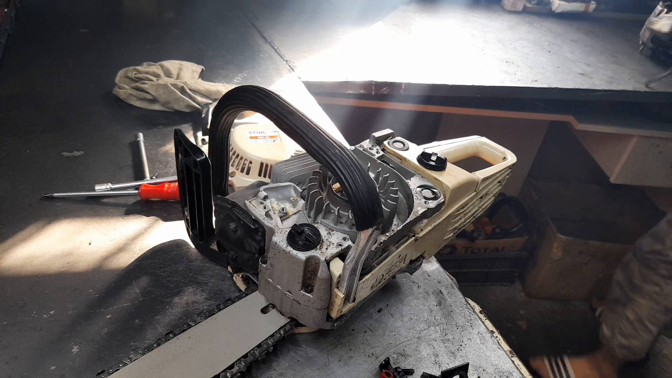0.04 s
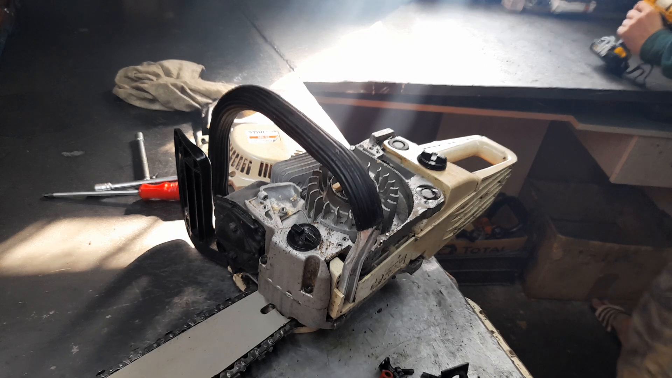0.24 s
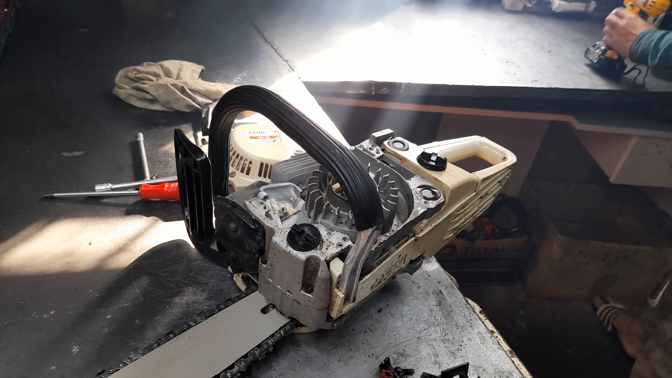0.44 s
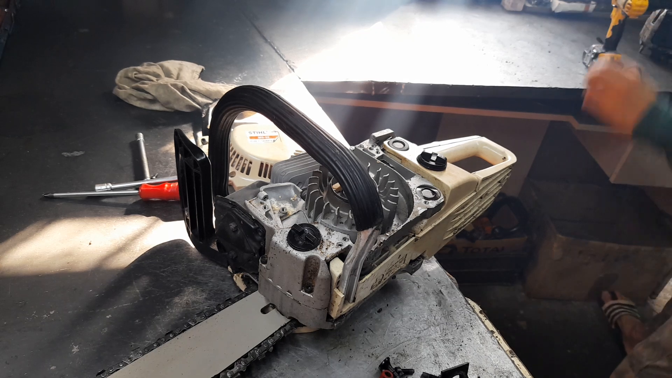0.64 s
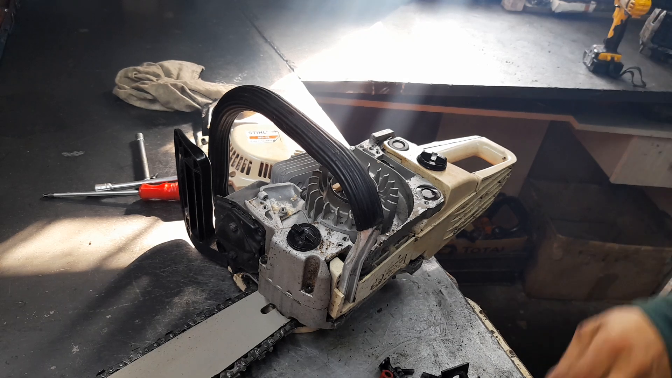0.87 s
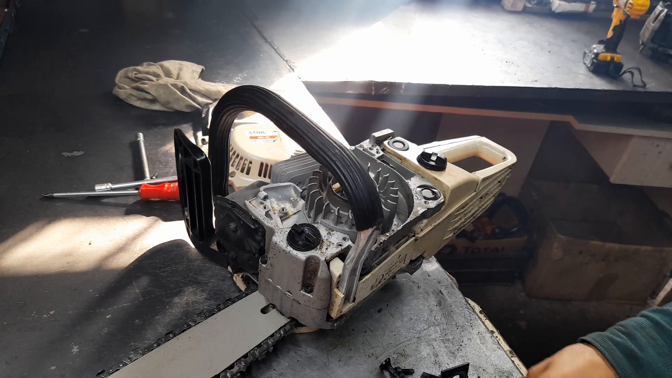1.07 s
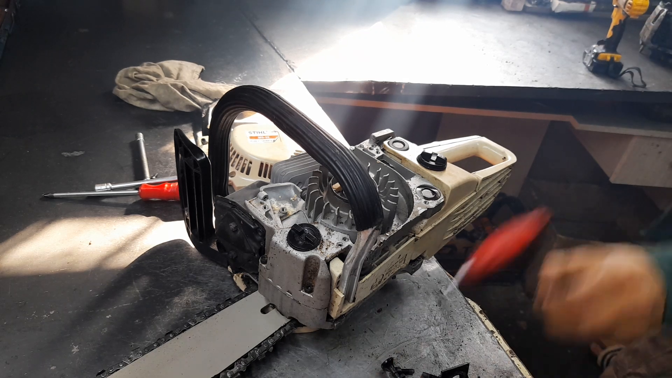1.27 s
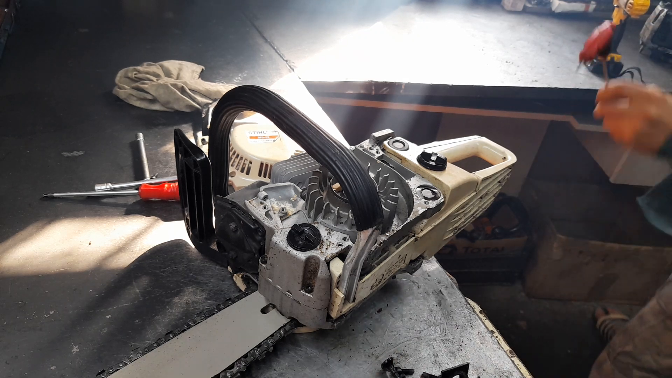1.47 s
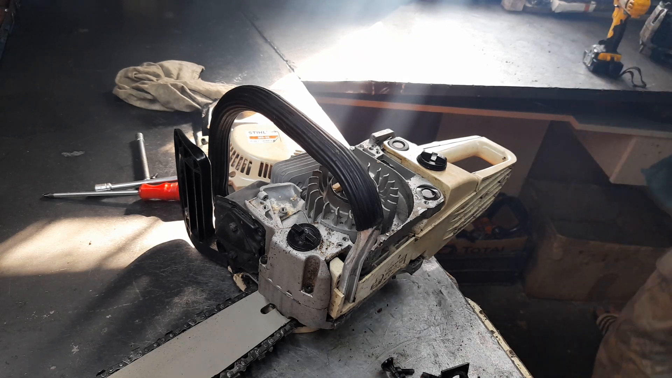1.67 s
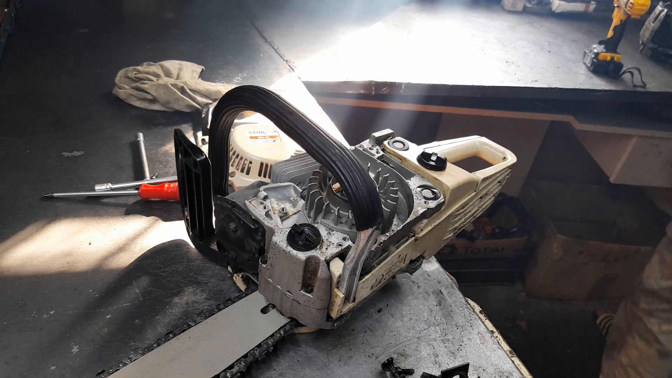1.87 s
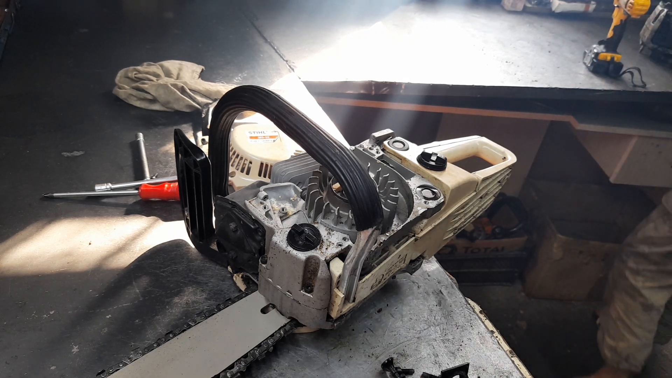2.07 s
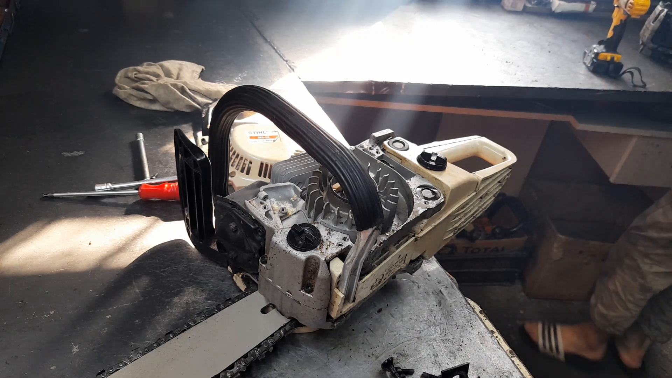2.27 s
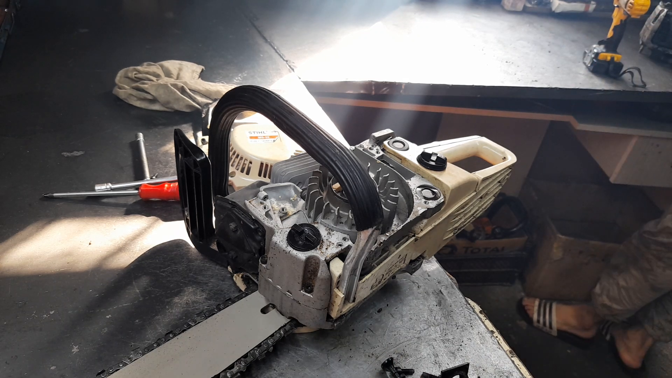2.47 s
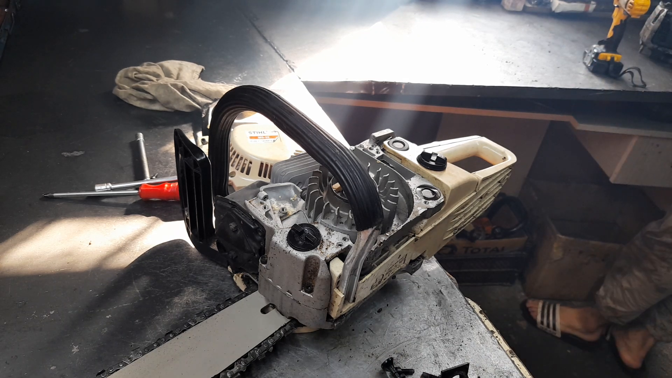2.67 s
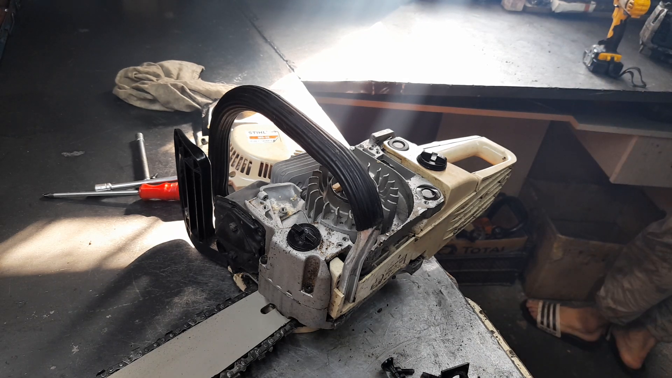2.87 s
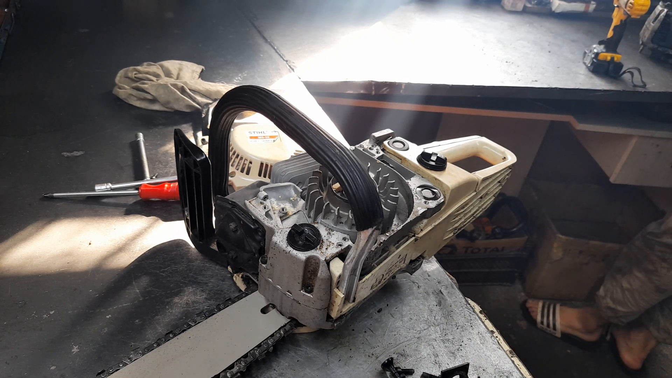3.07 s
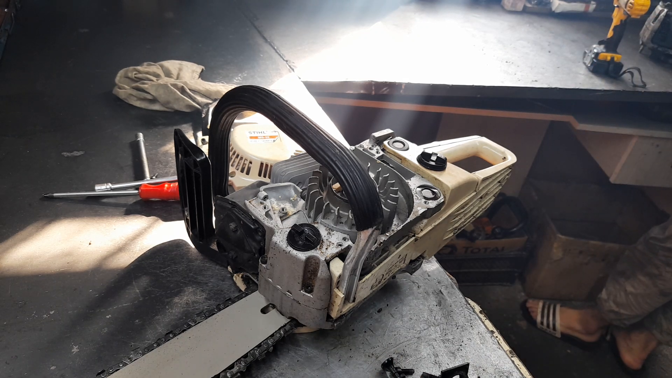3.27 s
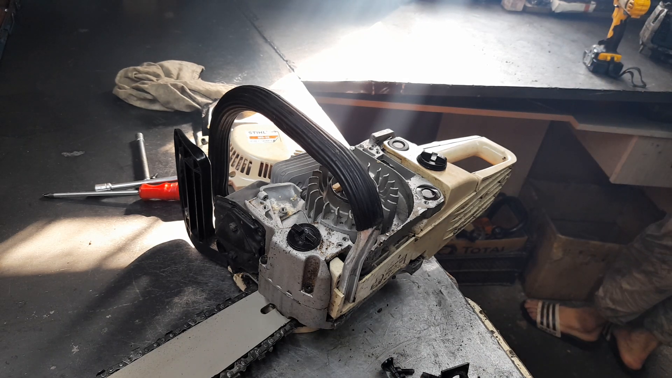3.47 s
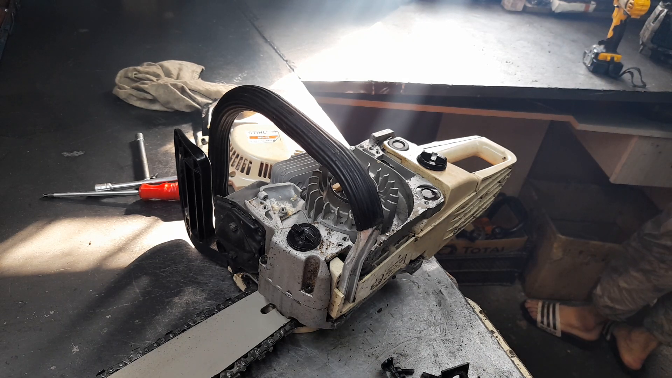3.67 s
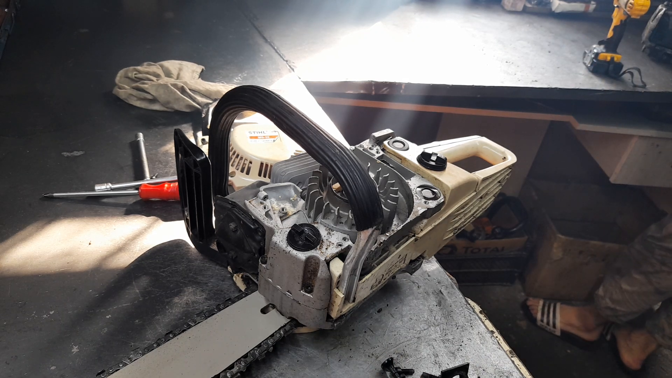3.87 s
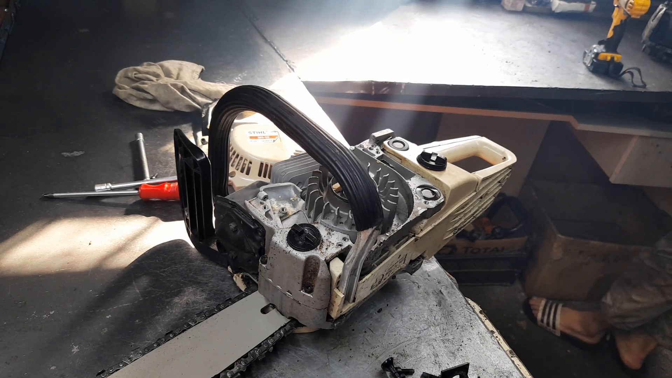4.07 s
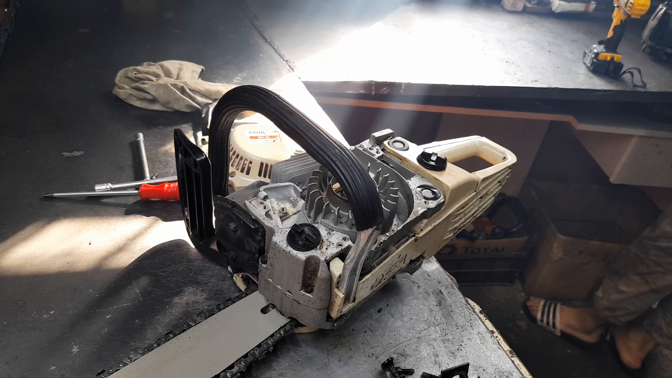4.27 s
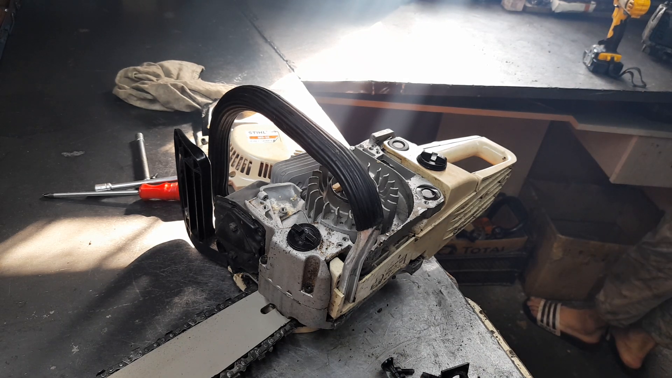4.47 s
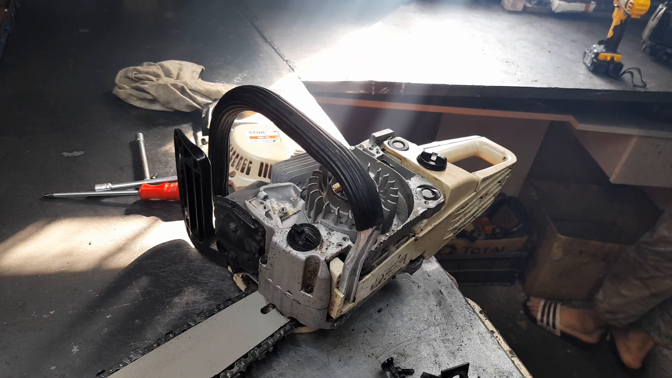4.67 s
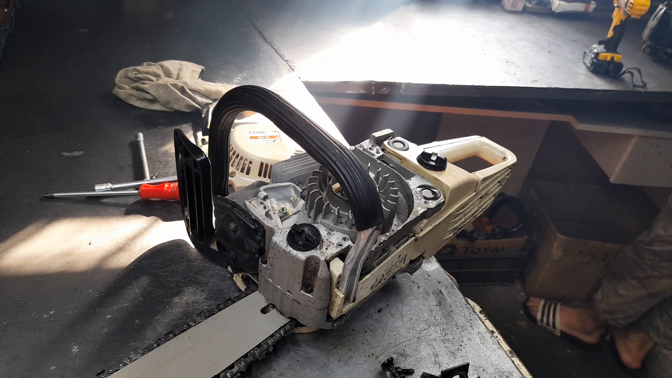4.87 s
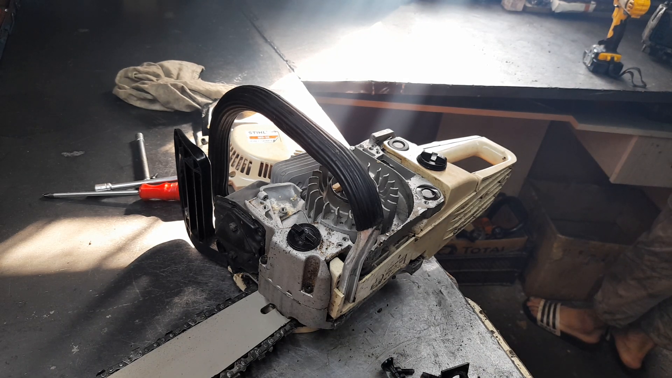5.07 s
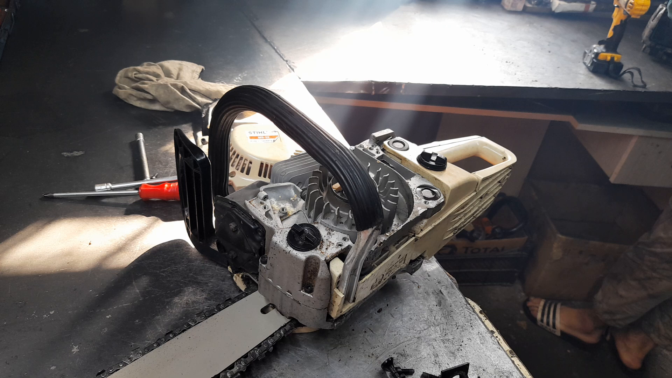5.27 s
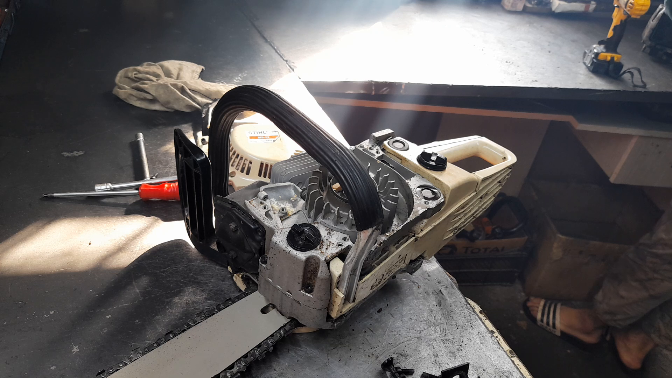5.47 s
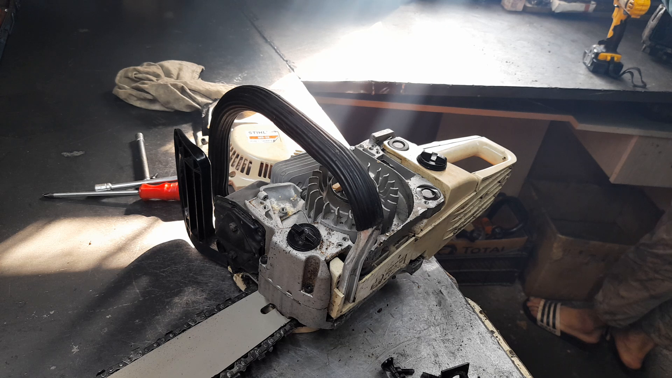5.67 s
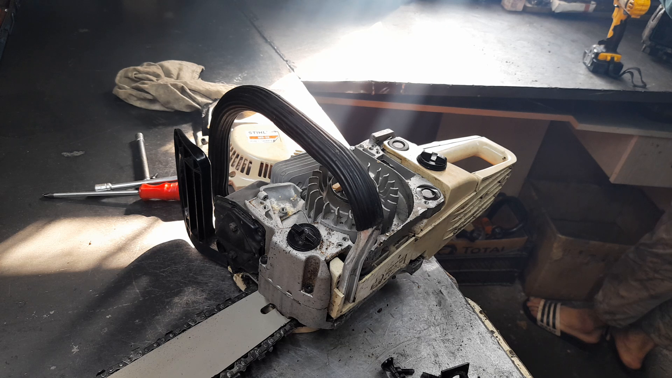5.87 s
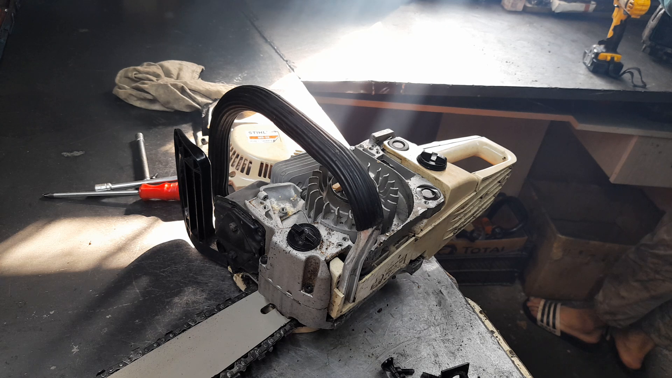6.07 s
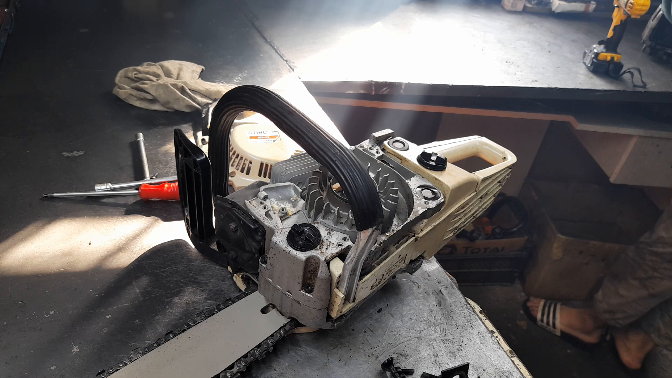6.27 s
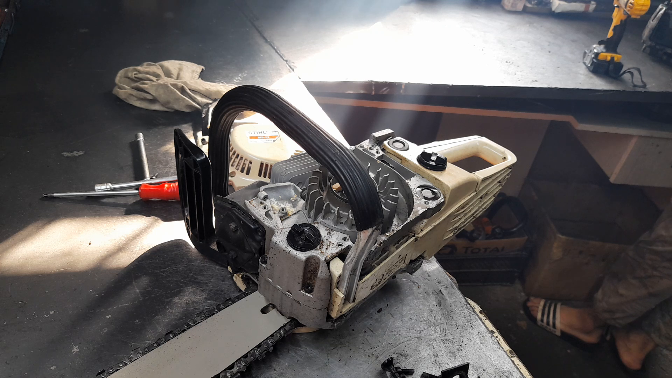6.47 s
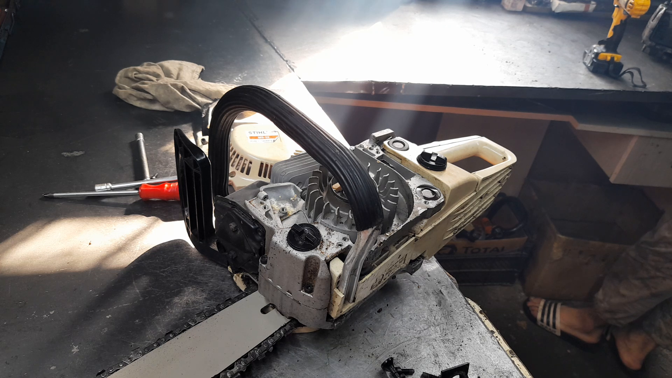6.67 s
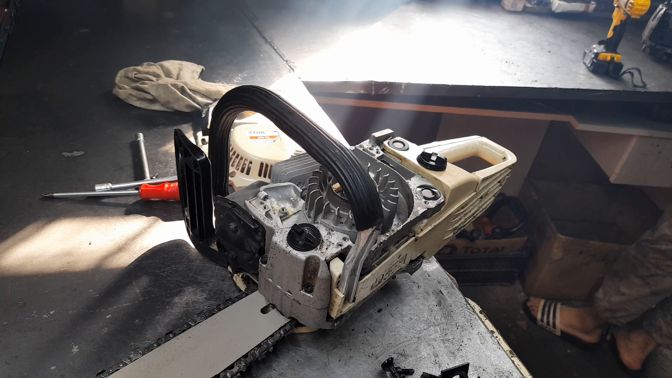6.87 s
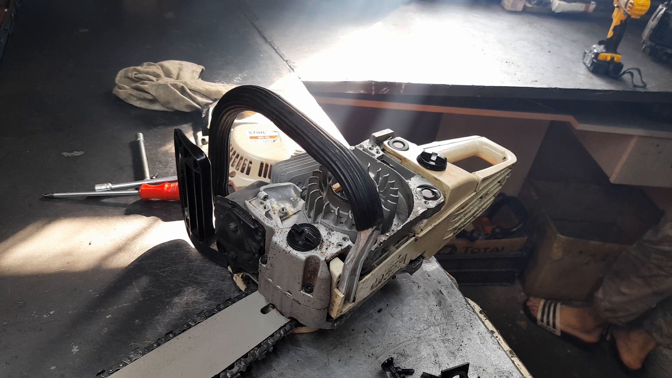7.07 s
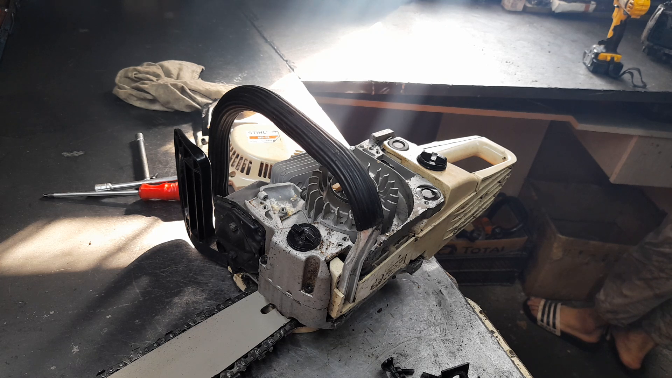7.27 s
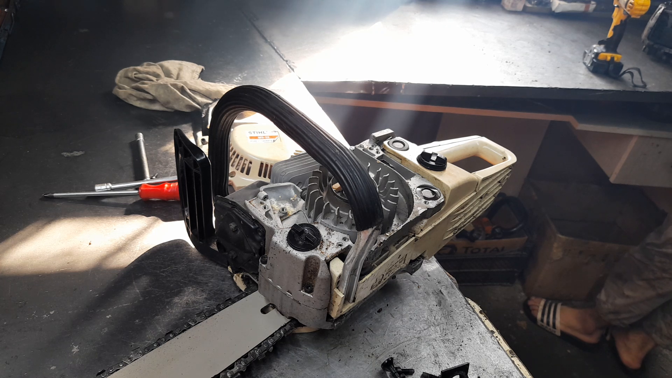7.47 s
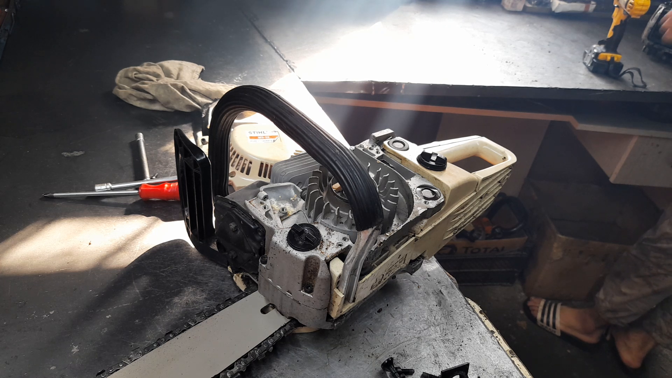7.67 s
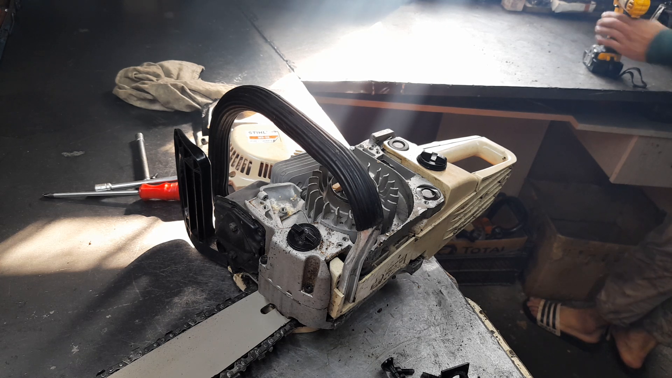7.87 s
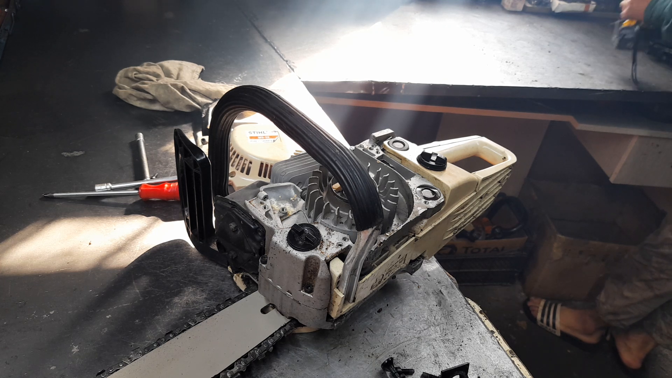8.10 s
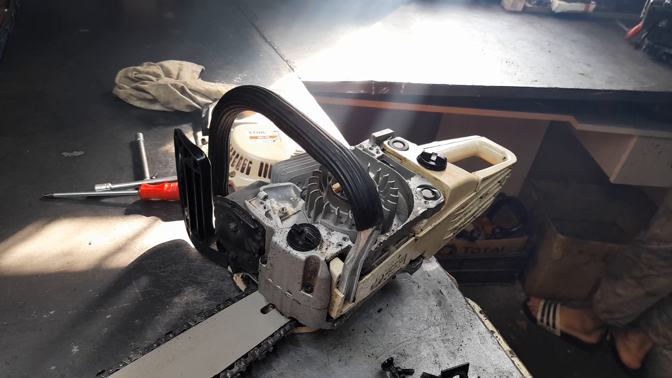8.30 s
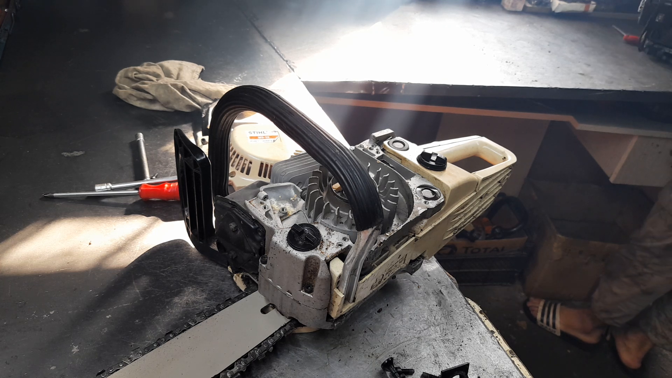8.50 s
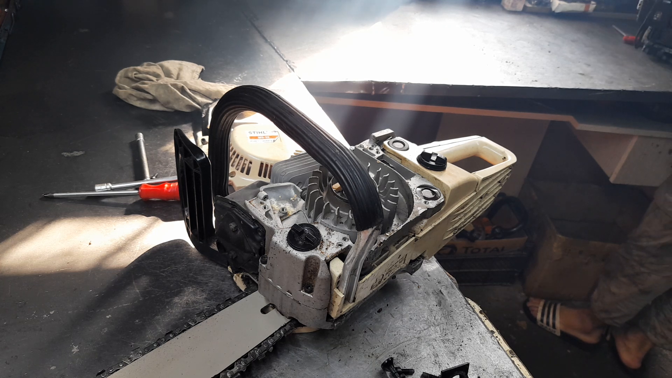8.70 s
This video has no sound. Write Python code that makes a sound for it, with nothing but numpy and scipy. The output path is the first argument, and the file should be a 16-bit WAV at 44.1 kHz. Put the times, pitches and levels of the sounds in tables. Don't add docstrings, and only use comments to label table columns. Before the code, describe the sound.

Skid and heavy tool knock in a small workshop, sparse sandal slaps over booming boards, ending with a burst of ringing part drops.

```python
import sys
import numpy as np
from scipy import signal
from scipy.fft import rfft, irfft, next_fast_len
from scipy.io import wavfile
from scipy.ndimage import uniform_filter1d

SR = 44100
rng = np.random.default_rng(int(sys.argv[2]) if len(sys.argv) > 2 else 0)


def ratio(d):
    e = np.asarray(d, float) / 20
    return 10 ** e


def int16_out(signal):
    q = np.round(np.clip(np.atleast_2d(signal).T, -1, 1) * 32767)
    wavfile.write(sys.argv[1], SR, q.astype(np.int16))


N = 385434
CLOSE_DIRECT, FAR_DIRECT = 0.3, 0.12


def evened(x):
    return x / np.sqrt(np.mean(x ** 2) + 1e-20)


def read(points, hz):
    f, value = np.transpose(points)
    return np.interp(np.log(hz + 1), np.log(f + 1), value)


def add(mix, s, sound):
    part = mix[round(s * SR):][:len(sound)]
    part += sound[:len(part)]


def resonate(x, hz, width):
    return signal.lfilter(*signal.iirpeak(hz, hz / width, SR), x)


def follow(x, hz, width):
    turn = np.exp(2j * np.pi * np.cumsum(hz) / SR)
    r = np.exp(-np.pi * width / SR)
    return (turn * signal.lfilter([1 - r], [1, -r], x / turn)).real


def band(x, lo_hz, hi_hz):
    sos = signal.butter(2, [lo_hz, hi_hz], "band", fs=SR, output="sos")
    return evened(signal.sosfiltfilt(sos, x))


# (frequency [Hz], level per Hz [dB])
AIR = [(65, -28), (110, 2), (125, -15.5), (211, -29), (487, -25), (1280, -33), (15500, -46.5), (16500, -61)]
# (frequency [Hz], left-right likeness [-1 to 1])
SAME = [(60, 0.96), (180, 0.61), (550, 0.31), (1650, 0.8), (4970, -0.19), (15000, -0.0)]


def air():
    level_db = -71.5 + 3.5
    hollow_hz, hollow_width_hz, hollow_db = 333, 90, 10.5
    frames, hz = N // 256 + 5, np.fft.rfftfreq(1024, 1 / SR)
    a, b, c, d, patches = rng.standard_normal((frames, 513, 5)).T
    patches = evened(uniform_filter1d(uniform_filter1d(patches, 12, 0), 20, 1))
    same = np.clip(read(SAME, hz), -1, 1)[:, None]
    left = a + 1j * b
    right = same * left + np.sqrt(1 - same ** 2) * (c + 1j * d)
    hollow = hollow_db / (1 + (2 * (hz - hollow_hz) / hollow_width_hz) ** 2)
    gain = ratio((read(AIR, hz) + hollow)[:, None] + 1.9 * patches)
    z = np.array([left, right]) * gain * (hz > 100)[:, None]
    return ratio(level_db) * evened(signal.istft(z, nperseg=1024, noverlap=768)[1][:, :N])


# (frequency [Hz], width [Hz], level [dB])
HUM = [(59, 4.9, 1), (87, 14, -1), (115.5, 8.7, -9)]
# (time [s], strength [dB])
DRAG_SHAKE = [
    (1.97, -36),
]


def rumble(thumps):
    idle_db, shake_db, shake_per_db = -62, -48.5, 0.6655
    rise_s, t60_s = 0.12, 2
    s, peak_db = np.transpose([row[:2] for row in thumps] + DRAG_SHAKE)[:, :, None]
    t = np.arange(0, N + 256, 256) / SR
    age = np.maximum(t - s, 0)
    rise = 1 - np.exp(-(age / rise_s) ** 2)
    stirred = rise * ratio(shake_db + shake_per_db * (peak_db + 29) - 60 * age / t60_s)
    level = np.sqrt(ratio(idle_db) ** 2 + (stirred ** 2).sum(0))
    shake = rng.standard_normal(N)
    modes = sum(ratio(db) * evened(resonate(resonate(shake, f, w), f, 2 * w)) for f, w, db in HUM)
    return np.interp(np.arange(N) / SR, t, level) * modes


# (frequency [Hz], t60 [s])
WALLS = [(250, 0.66), (660, 0.28), (1740, 0.23), (4590, 0.19), (12100, 0.15)]


def walls(x, rattle=1, direct=FAR_DIRECT):
    lag = 8
    size = SR // 3
    taps, age = np.zeros((2, size)), np.arange(30, size - 6, 6)
    uneven_db = 1.4 * np.exp(-age / (0.036 * SR)) * np.minimum(rng.exponential(1, (2, len(age))), 3)
    places = age + rng.integers(0, 6, uneven_db.shape)
    np.put_along_axis(taps, places, rng.choice([-1., 1.], uneven_db.shape) * ratio(uneven_db), 1)
    hz, t, z = signal.stft(taps, SR, nperseg=256)
    z[0] += np.clip(1.8 - hz / 450, 0, 3)[:, None] * z[1]
    late = ratio(-19.5 - 60 * t / 0.56) * (1 - t / t[-1])
    fall = ratio(-60 * np.maximum(t - 0.008, 0) / (rattle * read(WALLS, hz)[:, None]))
    build = 1 - 0.5 * np.exp(-t * np.sqrt(hz + 300)[:, None] * 6.0)
    tail = signal.istft(z * build * (fall + late), SR, nperseg=256)[1]
    tail /= np.linalg.norm(tail, axis=1)[:, None]
    tail[0, lag] += direct
    tail[1, 0] += direct
    return signal.fftconvolve(x[None], tail, axes=1).T * ratio([-0.8, 0.8])


def stroke(start, length, level_db, ring_hz, low_db, sag_db, top_db):
    attack_s, release_s, lift_db = 0.01, 0.048, -12
    s = start + np.array([0, attack_s, length - release_s, length])
    pressure_db = level_db + np.array([lift_db, 0, sag_db, sag_db + lift_db])
    return s, pressure_db, low_db, top_db, ring_hz


# (frequency [Hz], width [Hz], level [dB])
SOLE = [(1300, 700, -5.5), (2050, 690, 12.5), (3900, 1600, -3), (6520, 650, -4.5)]


def slide(s, pressure_db, low_db, top_db, ring_hz):
    t = np.arange(s[0], s[-1], 1 / SR)
    level_db = np.interp(t, s, pressure_db)
    grit = rng.choice([-1., 1.], len(t)) * ratio(2.0 * np.minimum(rng.exponential(1, len(t)), 4))
    flutter_db = 2.5 * evened(uniform_filter1d(rng.standard_normal(len(t)), 500))
    rub = grit * ratio(flutter_db)
    rubber = evened(sum(ratio(db) * resonate(rub, f, w) for f, w, db in SOLE))
    sole = band(rub, 1000, 6500) + 1.1 * rubber
    ring = 0.35 * evened(follow(rub, np.full(len(t), ring_hz), 0.091 * ring_hz))
    if ring_hz < 1200:
        ring *= ratio(low_db - 2.5)
    body = ratio(low_db - 6.0) * band(rub, 380, 1300)
    hiss = ratio(top_db) * band(rub, 4200, 18000)
    return ratio(level_db) * (evened(sole) + body + hiss + ring) * signal.windows.tukey(len(t), 0.06)


def drag(near, pressure):
    for _ in range(2):
        add(near, pressure[0][0], ratio(-5.0) * walls(slide(*pressure)))


# (start [s], length [s], level [dB], ringing [Hz], low body [dB])
SKIDS = [
    (0.0, 0.069, -33, 640, 0),
    (0.289, 0.23, -26.5, 550, 1.5),
    (3.475, .1, -60, 1105, 5),
    (3.98, 0.17, -56, 597, 3),
    (4.28, 0.084, -63.5, 603, 5.5),
    (8.549, 0.11, -51.5, 670, 1),
]


def skids(near):
    for row in SKIDS:
        drag(near, stroke(*row, sag_db=-190 * row[1], top_db=-11.5))


# (start [s], length [s], frequency [Hz], level [dB])
SQUEAKS = [(0, 0.012, 1080, -34), (0.081, 0.12, 585, -46), (0.13, 0.05, 3800, -56.5),
           (2.697, 0.03, 3530, -55), (3.467, 0.057, 12700, -75), (3.634, 0.034, 3500, -66),
           (3.635, .03, 4390, -73), (5.042, 0.084, 379, -74), (5.208, 0.057, 696, -70),
           (5.788, 0.078, 426, -69.5), (6.98, .07, 2410, -79), (7.506, 0.039, 12200, -69.5)]


def squeaks(near):
    for s, length, hz, db in SQUEAKS:
        size = round(length * SR)
        fuzz = evened(resonate(rng.standard_normal(size), hz, 30 + 0.045 * hz))
        swell = np.sin(np.pi * np.linspace(0, 1, size) ** 0.6)
        add(near, s, walls(ratio(db) * fuzz * swell))


# (start [s], length [s], level [dB], ringing [Hz], low body [dB])
SCUFFS = [(0.056, 0.16, -40, 640, -0.5), (0.656, 0.19, -66, 463, 5.5), (0.885, 0.15, -57, 1300, 2),
          (1.059, 0.13, -54, 610, 8.5), (1.881, 0.3, -51, 1650, -2), (2.129, 0.15, -54.5, 740, 2),
          (2.326, 0.15, -46.5, 2150, -6.5), (3.301, 0.11, -71, 700, 0), (5.16, .12, -82, 520, 8.5),
          (5.77, 0.11, -83.5, 443, 12), (6.953, 0.25, -72, 600, 5)]


def scuffs(near):
    for row in SCUFFS:
        drag(near, stroke(*row, sag_db=-3, top_db=-7.5))


# (time [s], peak [dB], boom [Hz], ring t60 [s])
FOOTFALLS = [(0.194, -55, 90.5, 0.37), (0.685, -32.5, 68.7, 0.99), (1.158, -45.5, 62.4, 0.26),
             (1.511, -52, 62.6, 0.36), (2.592, -30.5, 67.3, 0.31), (2.753, -33, 69, 0.47),
             (3.473, -37.5, 66, 0.38), (3.6, -47, 67.3, 0.25), (4.507, -61, 78.2, 0.54),
             (5.31, -41.5, 80, 0.29), (6.019, -45, 76.6, 0.28), (6.658, -30.5, 67.3, 0.47),
             (6.862, -46, 76.8, 0.72), (6.985, -33, 64.3, 0.32), (7.252, -21.5, 64, 0.36),
             (7.376, -30, 61.5, 0.67), (7.672, -31, 61.5, 0.48), (7.757, -22.5, 68.7, 0.28),
             (7.873, -38.5, 71.1, 0.57), (8.0, -32.5, 67.5, 1)]


def footfalls():
    return [(*row, -16.5 + 0.55 * (row[1] + 33), 21) for row in FOOTFALLS]


# (time [s], peak [dB], boom [Hz], ring t60 [s], upper modes [dB])
BLOWS = [
    (0.285, -7.5, 65.3, 0.58, -7.5),
    (1.05, -40.5, 64.6, 0.53, 8.5),
    (3.865, -27, 73, 0.7, -9.5),
    (4.117, -29.5, 62.03, 0.4, -11),
    (8.11, -23.5, 87.8, 0.37, 3.5),
    (8.252, -28, 86.5, 0.64, 7.5),
    (8.399, -36, 95.3, 1.01, 9.5),
    (8.471, -33.5, 80.3, 0.44, -13),
]


def blows():
    return [(*row, 14) for row in BLOWS]


# (frequency [Hz], level [dB])
BOARDS = [(50, -11.5), (88, -10.5), (128, -2.5), (160, -5.5), (200, -6.5), (250, -12), (305, -4),
          (395, -8.5)]


def thump(hz, t60, upper_db, rise_ms):
    t = np.arange(SR * 2 // 3) / SR
    rise = 1 - np.exp(-(t / (rise_ms / 1000)) ** 2)
    boom = np.sin(2 * np.pi * hz * t) + 0.16 * np.sin(2 * np.pi * 1.14 * hz * t)
    boom *= rise * ratio(-60 * t / t60)
    sound = boom.copy()
    for k, (f, db) in enumerate(BOARDS):
        fall_db = 60 * t / (t60 * (64 / f) ** 0.49)
        mode_db = db + (upper_db - 2.5) * (f > 100) - fall_db
        sound += (-1) ** k * rise * ratio(mode_db) * np.sin(2 * np.pi * f * t)
    return sound / abs(boom).max()


def knock(modes, low_db, snap_db, top_db):
    hz = abs(np.fft.fftfreq(4096, 1 / SR))
    colour = [(120, low_db - 10), (450, low_db + 7), (1600, 0.00039),
              (4200, snap_db + 0.63), (10000, top_db - 6.5), (18000, top_db - 6.5)]
    f, width, db = np.transpose(modes)[:, :, None]
    peaks = 0.54 * ratio(0.4 * db) / (1 + (2 * (hz - f) / np.maximum(width, 60)) ** 2)
    log_gain = np.log(ratio(read(colour, hz) - 0.5) * (1 + peaks.sum(0)))
    slap = np.fft.ifft(np.exp(log_gain - 1j * signal.hilbert(log_gain).imag)).real[:1500]
    touches = np.zeros(400)
    touches[[0, *rng.integers(60, 400, 2)]] = 1, 0.25, 0.2
    return np.convolve(touches, slap)


def strike(near, hits, modes, rattle, direct=FAR_DIRECT):
    for s, crack_db, *colour_db in hits:
        add(near, s, ratio(crack_db + 32.5) * walls(knock(modes, *colour_db), rattle, direct))


# (frequency [Hz], width [Hz], level [dB])
TOOL = [(372, 36, -1), (680, 35, -7.5), (1420, 250, -8), (1710, 26, -3), (2300, 29, -12.5),
        (3720, 130, -16.5)]
# (time [s], crack [dB], low body [dB], snap [dB], top [dB])
SET_DOWN = [
    (0.2657, -8.5, -8.5, -16.5, -15.5),
    (0.3093, -20, -1, -29, -15),
    (0.4796, -50.5, -1.5, -7.5, -6),
]


def set_down(near):
    strike(near, SET_DOWN, TOOL, rattle=0.93)


# (frequency [Hz], width [Hz], level [dB])
SANDAL = [(2270, 130, 3), (3215, 53, -3.5), (3978, 29, -3.5), (4700, 33, -1.5), (5450, 160, -2),
          (7300, 1600, -4)]
# (time [s], crack [dB], low body [dB], snap [dB], top [dB])
PICKING = [
    (0.6626, -58, 10, -16, -3),
    (0.8845, -43, -5, -8.5, -13),
    (1.052, -45, 17.5, -16, -8),
    (1.0694, -47, 8, -3.5, 3.5),
    (1.1409, -40.5, -13, -24, -3),
]


def pick_parts(near):
    strike(near, PICKING, SANDAL, rattle=0.82)


# (time [s], firing tone [Hz], level [dB])
ENGINE = [
    [(1.3, 49.57, -67.5), (1.6, 45.6, -67), (2.1, 45.12, -50.5), (2.3, 43.7, -57.5), (2.5, 39.5, -83)],
    [(2.9, 35.9, -71), (3.6, 33.13, -59), (4.4, 33.98, -60), (5.3, 34.14, -63.5), (6.0, 34.9, -70.5),
     (6.7, 34.8, -65.5)],
]


def engine(rows):
    s, hz, level_db = np.transpose(rows)
    t = np.arange(s[0], s[-1], 1 / SR)
    turns = 2 * np.pi * np.cumsum(np.interp(t, s, hz)) / SR
    waver_db = 2.2 * evened(uniform_filter1d(rng.standard_normal(len(t)), 4000))
    level = ratio(np.interp(t, s, level_db) + 4.0 + waver_db)
    return s[0], level * (np.sin(turns) + 0.18 * np.sin(2 * turns)) * signal.windows.tukey(len(t), 0.15)


# (time [s], crack [dB], low body [dB], snap [dB], top [dB])
STEPS = [(2.3386, -47.5, -25.5, 2, -22), (2.4592, -48.5, -5.5, -3, -6), (2.5563, -47, -3.5, 0.5, -7.5),
         (2.5823, -35.5, -18, 0, -4), (2.698, -48, -9, 0, -20), (2.7212, -39.5, -8, -20, -26),
         (3.444, -37, -18.5, -20.5, -35), (3.6359, -56, -1.5, -1.5, -21), (3.661, -54.5, -4, -29, -18.5),
         (4.0944, -52, 10.5, -11, -13.5), (4.2571, -55, -7, -12, -15), (4.786, -72, -4.5, 16.5, 13.5),
         (5.2895, -30.5, -15, -9.5, -17.5), (5.9977, -37.5, -8.5, -4, -10.5), (6.6312, -28, -14, -4, -21.5),
         (7.4061, -43.5, -0.5, -16, -15.5), (7.6476, -39, 5.5, -29, -27), (7.6898, -57.5, 1, -5, -4.5),
         (7.7256, -40, 1, -7.5, -10.5), (7.9597, -61, -1.5, -3.5, -9), (8.0065, -50.5, -10.5, -16, -15.5)]


def steps(near):
    strike(near, STEPS, SANDAL, rattle=1.05)


# (time [s], crack [dB], low body [dB], snap [dB], top [dB])
CLOSE_SLAPS = [
    (3.8362, -18.5, -18, -2.5, 2.5),
    (7.2262, -22, -15, 6.5, 5),
]


def close_slaps(near):
    strike(near, CLOSE_SLAPS, SANDAL, rattle=1.16, direct=CLOSE_DIRECT)


# (frequency [Hz], width [Hz], level [dB])
CRATE = [(1220, 220, -10.5), (2375, 28, 4), (2580, 42, -17), (3260, 63, -23), (3520, 41, -14),
         (4040, 120, 7), (4830, 49, -8)]
# (time [s], crack [dB], low body [dB], snap [dB], top [dB])
DROPS = [
    (8.0966, -11.5, -6.5, -8.5, -1.5),
    (8.2355, -20, -2.5, -9.5, -2.5),
    (8.3418, -21, -8, -15.5, -11),
    (8.3869, -17, -12, -8.5, 1.5),
    (8.4536, -5, -11, -14.5, -9.5),
    (8.5991, -52.5, 1, 2, 3),
    (8.7294, -50, 2, -3, -13),
]


def drops(near):
    strike(near, DROPS, CRATE, rattle=1.02)


def scene():
    near = np.zeros((N, 2))
    thumps = footfalls() + blows()
    low = rumble(thumps)
    for source in (skids, squeaks, scuffs, set_down, pick_parts, steps, close_slaps, drops):
        source(near)
    for s, peak_db, *rest in thumps:
        add(low, s - 0.012, ratio(peak_db) * thump(*rest))
    for rows in ENGINE:
        add(low, *engine(rows))
    return near.T + low * ratio([[-1.6], [1.4]]) + air()


def band_limit(x):
    return signal.sosfilt(signal.butter(12, 16980, fs=SR, output="sos"), x)


# (frequency [Hz], level [dB])
MIC = [(20, -7), (45, -0.5), (8700, 0.5), (12000, 4), (15300, 0.5), (15800, -2.5), (16200, -27),
       (20000, -29)]


def record(dry):
    size = next_fast_len(N + 4096)
    gain = ratio(read(MIC, np.fft.rfftfreq(size, 1 / SR)))
    heard = irfft(rfft(dry, size) * gain, size)[:, :N]
    return band_limit(heard)


dry = scene()
out = record(dry)
int16_out(out)
```